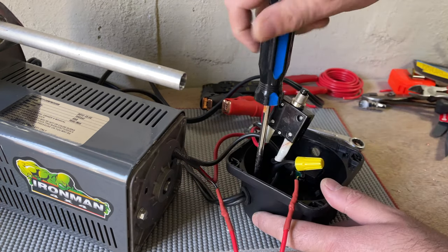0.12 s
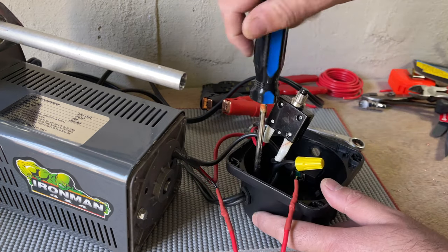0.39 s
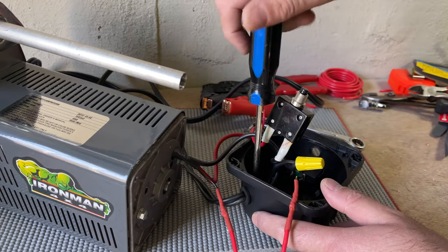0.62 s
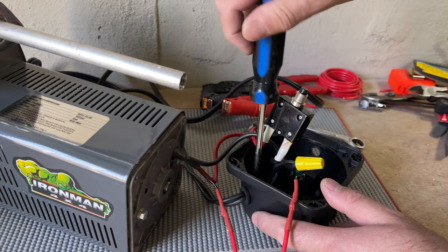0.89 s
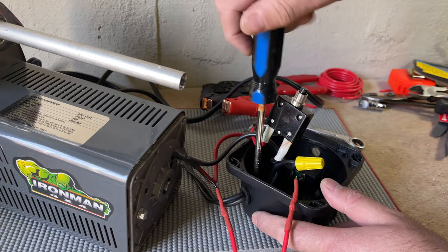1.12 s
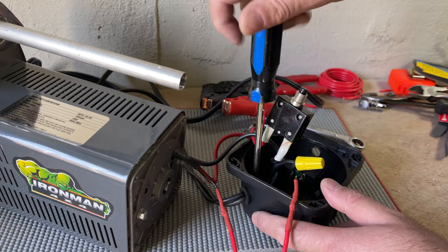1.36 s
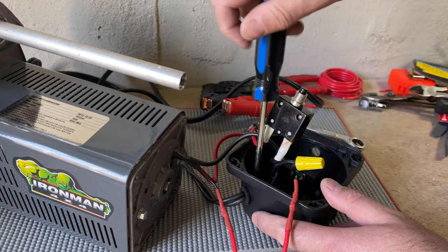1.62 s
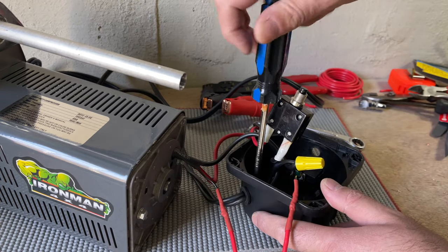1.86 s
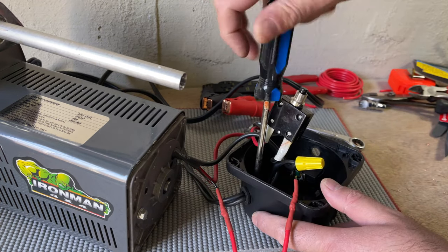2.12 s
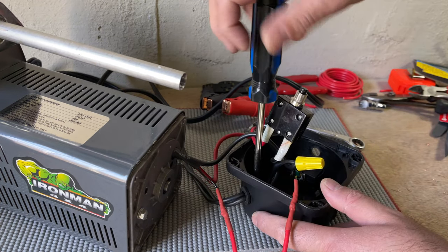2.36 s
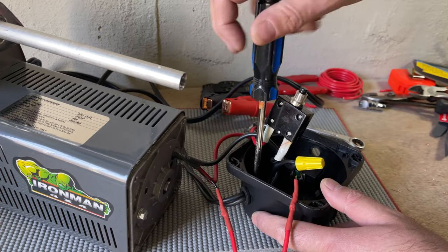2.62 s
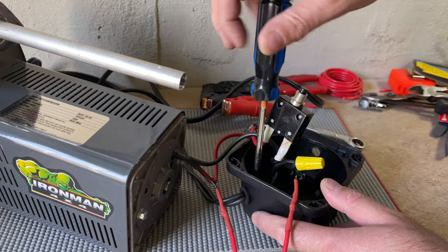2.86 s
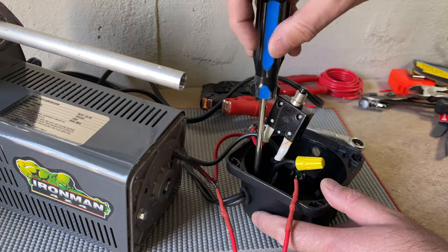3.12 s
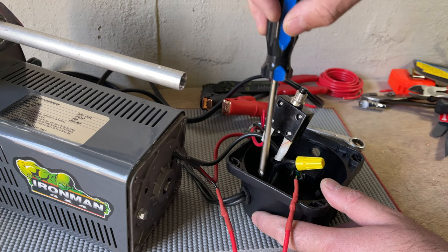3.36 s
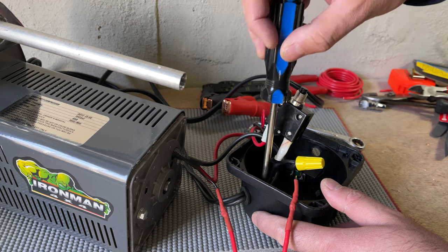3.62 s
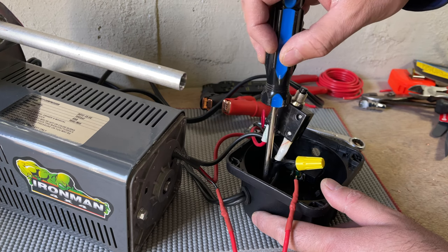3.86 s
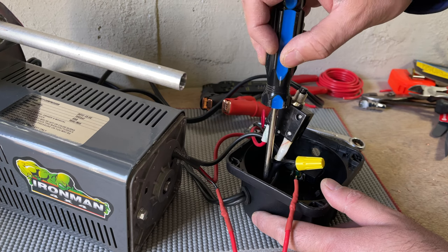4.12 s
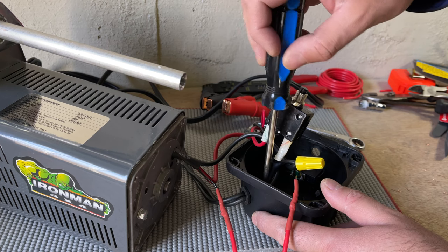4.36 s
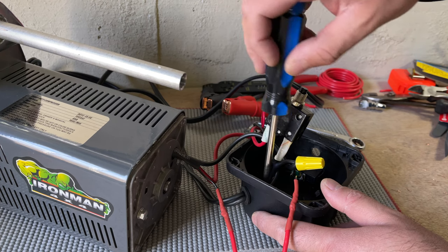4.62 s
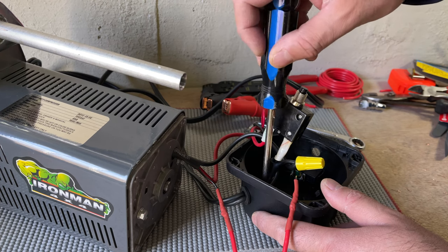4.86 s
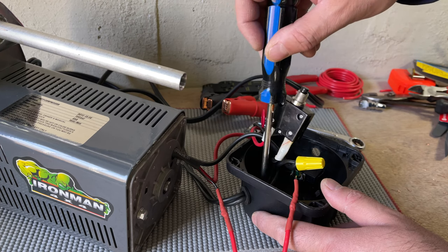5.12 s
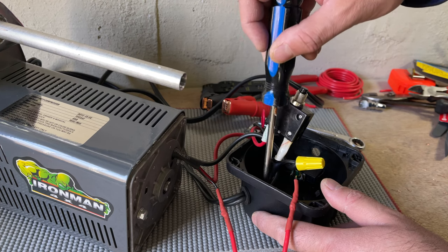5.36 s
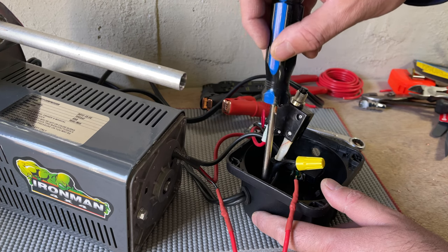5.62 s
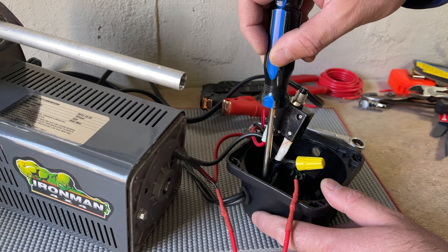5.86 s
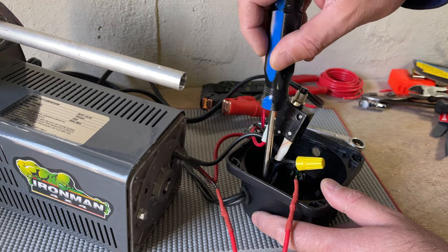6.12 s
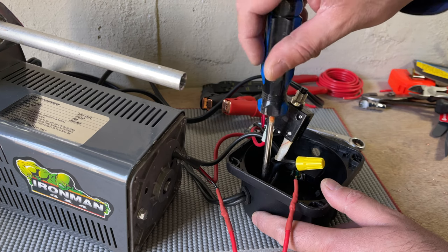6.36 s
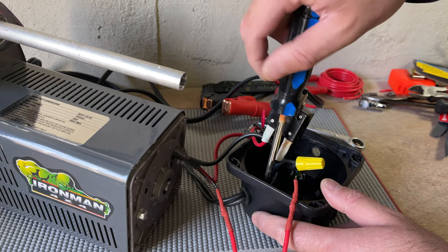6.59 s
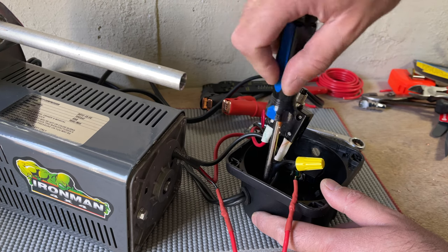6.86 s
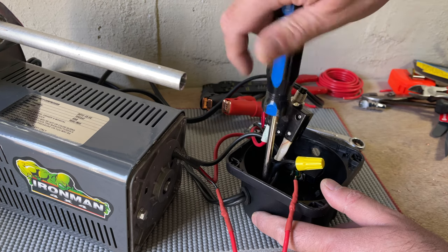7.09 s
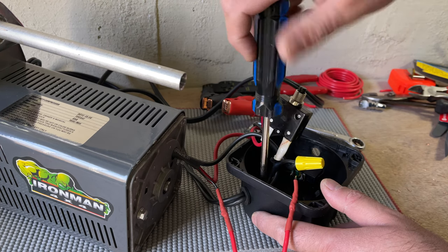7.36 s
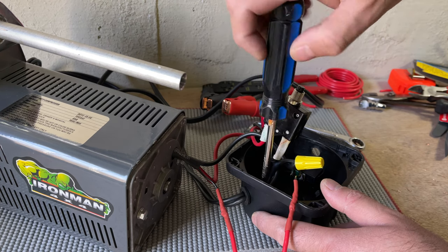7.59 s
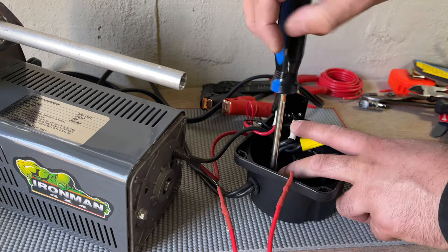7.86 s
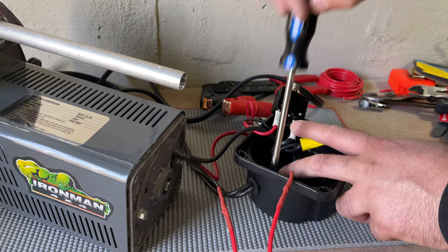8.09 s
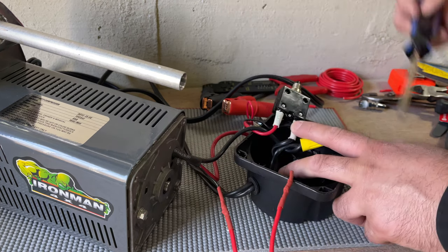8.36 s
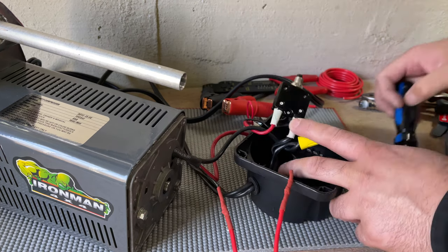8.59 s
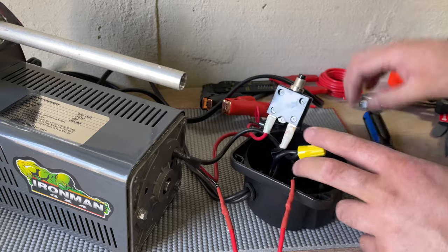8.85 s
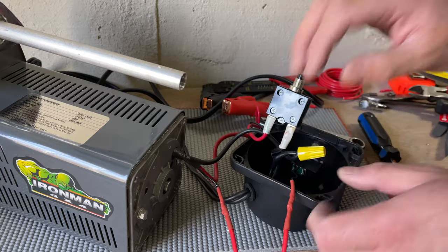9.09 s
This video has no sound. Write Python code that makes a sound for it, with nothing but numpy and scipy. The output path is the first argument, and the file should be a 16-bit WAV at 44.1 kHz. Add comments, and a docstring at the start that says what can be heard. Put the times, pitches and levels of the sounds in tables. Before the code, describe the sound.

Light irregular metal ticks and plastic knocks from a screwdriver working in a small box, with rapid papery finger slides between them. Later knocks are sharper and more isolated over very quiet low rumble and a distant engine-like hum. Near the end the tool is dropped: two heavy clattering impacts with small bounces on wood, by far the loudest event, then hand rustle. Close microphone, short indoor reverberation.

```python
"""In a small workshop, at a wooden bench, a screwdriver spun in the fingers drives screws into a plastic box.
The tip knocks and skids in the screw heads, ringing decaying modes of screw, box and bench with noise bursts.
Fingers slide on the grip as swelling noise; at the end the dropped tool bounces on the bench.
Shaped noise makes a low rumble from outside, a wavering sine a passing drone; the room scatters the blows.
A stereo microphone with resonant ports picks it all up, and its input stage rounds the peaks."""
import sys
import numpy as np
from scipy import signal
from scipy.fft import rfft, irfft, next_fast_len
from scipy.io import wavfile

SR = 44100
rng = np.random.default_rng(int(sys.argv[2]) if len(sys.argv) > 2 else 0)


def to_wav(s):
    """Save 16-bit WAV."""
    ch = np.atleast_2d(s).T  # columns
    pcm = np.round(np.clip(ch, -1, 1) * 32767)  # PCM
    wavfile.write(sys.argv[1], SR, pcm.astype(np.int16))


def makeup_ratio(level_db):
    """Linear amplitude ratio for a level in decibels (20 dB per factor of ten)."""
    decades = np.asarray(level_db, float) / 20
    return 10 ** decades


N = 406602

# modes of the wooden bench: f/Hz, level/dB, t60/s
BENCH_MODES = [(118, -22, 0.037), (165.2, -3.5, 0.16), (172.2, -5, 0.091), (219.3, -4.5, 0.065),
               (239, -10.5, 0.056)]


def rms_one(x):
    """Scaled to rms 1."""
    return x / np.sqrt(np.mean(x ** 2) + 1e-20)


def in_time(rows):
    """Columns of a table whose first column is t/s, interpolated at every sample."""
    s, *columns = np.transpose(rows)
    return [np.interp(np.arange(N) / SR, s, c) for c in columns]


def at_hz(points, hz, axis=1):
    """A column of a table, read on a log-frequency axis."""
    points = np.array(points)
    return np.interp(np.log(hz), np.log(points[:, 0]), points[:, axis])


def drift(rate_hz):
    """Random wander of rms 1: noise smoothed by two equal poles at rate_hz, at a 40th of the sample rate."""
    r = np.exp(-80 * np.pi * rate_hz / SR)
    noise = rng.standard_normal(N // 40 + 2002)
    slow = signal.lfilter([1], [1, -2 * r, r * r], noise)[2000:]
    return np.interp(np.arange(N) / 40, np.arange(len(slow)), rms_one(slow))


def ring(push, hz, t60):
    """A damped resonator: a unit click sets a sine of height 1 ringing."""
    r, w = makeup_ratio(-60 / (t60 * SR)), 2 * np.pi * hz / SR
    return signal.lfilter([0, np.sin(w)], [1, -2 * r * np.cos(w), r * r], push + 1e-18)


def band_pass(x, low_hz, high_hz):
    """Second-order Butterworth band."""
    return signal.sosfilt(signal.butter(2, [low_hz, high_hz], "band", fs=SR, output="sos"), x)


def bands(size):
    """Half-octave bands of stereo noise, each with its centre; mid and side set how alike the channels are."""
    # diffuse sound at the microphone: f/Hz, left-right likeness (1 = the same)
    likeness = [(60, 0.99), (200, 0.94), (400, 0.46), (900, 0.21), (2500, 0.32), (6000, 0.11), (8000, 0.87),
                (10000, 1), (13000, 0.9)]
    edges_hz = 22 * 2 ** np.arange(0, 9.6, .5)
    white = rng.standard_normal((2, 2, size))      # neighbouring bands take different noise
    for k, (low, high) in enumerate(zip(edges_hz, edges_hz[1:])):
        centre = np.sqrt(low * high)
        mid, side = band_pass(white[k % 2], low, high)
        alike = np.clip(at_hz(likeness, centre), -1, 1)
        yield centre, np.sqrt(1 + alike) * mid + np.sqrt(1 - alike) * side * [[1], [-1]]


def room_tone():
    """Shaped noise of the quiet room, moving as a whole with the rumble from outside."""
    # spectrum of the quiet room: f/Hz, relative level per Hz/dB
    quiet = [(15, -49), (27, -20.5), (40, -3), (60, 4), (92, -9), (119, -6.5), (155, -23), (266, -33),
             (381, -28), (485, -40), (1000, -64.5), (3000, -63.5), (6600, -62.5), (12000, -69)]
    # outside rumble, below 50 Hz: t/s, level/dB
    rumble = [(0.0, -56), (0.6, -58), (1.8, -59.5), (3.3, -58), (3.7, -62.5), (4.9, -58), (6.2, -62),
              (6.9, -61), (7.84, -56.5), (8.17, -66), (8.5, -62.5)]
    tone = sum(band * makeup_ratio(at_hz(quiet, hz)) for hz, band in bands(N))
    tone_low = signal.sosfilt(signal.butter(4, 50, fs=SR, output="sos"), tone)
    rumble_db, = in_time(rumble)
    return makeup_ratio(rumble_db) * tone / np.std(tone_low)


def drone():
    """A far engine note: one sine that wavers a little in level, glides in pitch and stops."""
    # the far note: t/s, f/Hz, level/dB
    note = [(5.3, 58.6, -62), (5.45, 59.05, -46.5), (6.04, 60.1, -49.5), (6.32, 62, -51.5),
            (6.45, 64.03, -47), (7.13, 62, -47), (7.6, 60.07, -48.5), (7.8, 65.1, -43), (7.82, 62, -65)]
    hz, level_db = in_time(note)
    start, stop = note[0][0], note[-1][0]
    on = np.interp(np.arange(N) / SR, [start - .2, start, stop, stop + 0.04], [0, 1, 1, 0])
    wave = np.sin(2 * np.pi * np.cumsum(hz) / SR)
    return np.sqrt(2) * on * makeup_ratio(level_db + 0.5 * drift(8.3)) * wave


def bench_tremble():
    """Uneven small pushes of the hands keep the bench modes stirring."""
    # bench under the hands: t/s, level/dB
    tremble = [(0.0, -51), (0.6, -59.5), (0.9, -72.5), (1.24, -60), (1.85, -58), (2.0, -50), (2.35, -58),
               (2.5, -40.5), (2.64, -59.5), (3.1, -59), (3.33, -76), (4.0, -76), (4.66, -57.5),
               (5.05, -90.5), (6.2, -90), (6.47, -46.5), (6.9, -74.5), (7.3, -59.5), (8.05, -76.5)]
    pushes = rng.standard_normal(N) * makeup_ratio(4.3 * drift(17.3))
    stir = sum(makeup_ratio(db) * ring(pushes, hz, t60) for hz, db, t60 in BENCH_MODES)
    level_db, = in_time(tremble)
    return makeup_ratio(level_db) * rms_one(stir)


def finger_levels():
    """Each slide swells to its loudest moment and fades, over a background of hiss and rub; both in dB."""
    # background hiss and rub under the slides: t/s, hiss level/dB, coarse rub level/dB
    background = [(0, -64.5, -70.5), (0.6, -71.5, -86.5), (1.7, -64.5, -94), (1.82, -98, -105),
                  (2.15, -63.5, -74), (3.0, -72, -88.5), (3.9, -84.5, -100), (4.3, -103, -88),
                  (5.3, -80, -110), (6.05, -87.5, -105), (6.25, -71, -82), (7.0, -80, -91),
                  (7.75, -64, -95), (7.84, -94, -98), (8.0, -90, -92), (8.1, -53, -75), (8.55, -63, -78),
                  (9.219, -46, -59)]
    # slides over the grip: loudest moment t/s, swell/s, fade/s, skin hiss level/dB, coarse rub level/dB
    slides = [(0.114, 0.057, 0.044, -57, -89), (0.233, 0.042, 0.066, -49.5, -64),
              (0.377, 0.044, 0.024, -56, -74), (0.494, 0.094, 0.023, -45.5, -61.5),
              (0.706, 0.17, 0.12, -57.5, -69.5), (0.85, 0.032, 0.018, -55, -79),
              (0.93, 0.028, 0.24, -57, -73), (1.203, 0.1, 0.051, -52, -66), (1.335, 0.11, 0.17, -63, -77),
              (1.455, 0.033, 0.077, -52, -66), (1.73, 0.13, 0.038, -53.5, -64),
              (1.778, 0.057, 0.015, -68, -72), (1.917, 0.016, 0.036, -47.5, -70.5),
              (1.989, 0.16, 0.095, -54, -65.5), (2.243, 0.072, 0.047, -46, -61.5),
              (2.5, 0.1, 0.073, -51, -62), (2.735, 0.025, 0.038, -43.5, -56.5),
              (2.846, 0.065, 0.11, -66, -87), (2.983, 0.054, 0.068, -47.5, -69.5),
              (3.15, 0.0053, 0.08, -54, -62), (3.624, 0.53, 0.39, -72, -82), (4.46, 0.37, 0.37, -71, -76.5),
              (4.737, 0.28, 0.36, -73, -81), (5.93, 0.089, 0.056, -82, -84),
              (6.14, 0.069, 0.08, -68, -80.5), (6.485, 0.097, 0.061, -53, -69.5),
              (6.583, 0.1, 0.35, -60, -72), (6.779, 0.12, .2, -65, -66), (7.088, 0.54, 0.15, -59.5, -79),
              (7.264, 0.076, 0.032, -43, -60.5), (7.405, 0.13, 0.089, -61, -75),
              (7.54, 0.063, 0.049, -50.5, -62), (7.752, 0.012, 0.06, -57, -80),
              (7.779, .04, 0.036, -68, -74), (7.811, 0.035, 0.0067, -57, -69),
              (7.94, 0.065, 0.03, -50.5, -67), (8.05, 0.026, 0.071, -56, -63.5),
              (8.35, 0.41, 0.15, -50, -60.5), (9.043, 0.62, 0.18, -49.5, -54.5)]
    span_db = 20      # level change over one swell or fade time
    t, power = np.arange(N) / SR, makeup_ratio(2 * np.array(in_time(background)))
    for s, swell_s, fade_s, *levels_db in slides:
        near = slice(max(int((s - 3 * swell_s) * SR), 0), int((s + 3 * fade_s) * SR))
        away = np.maximum((s - t[near]) / swell_s, (t[near] - s) / fade_s)
        power[:, near] += makeup_ratio(2 * (np.array(levels_db)[:, None] - span_db * away))
    return 10 * np.log10(power)


def finger_noise(hiss_db, rub_db):
    """Skin hiss and coarse rubbing, two colours of one noise bank, flickering as skin sticks and slips."""
    # colour of the skin hiss: f/Hz, relative level per Hz/dB
    hiss_colour = [(5500, -59.5), (7000, 3), (9000, 5), (13000, 0.5)]
    # colour of the coarse rub: f/Hz, relative level per Hz/dB
    rub_colour = [(200, -0.5), (350, 12), (1200, 6.5), (1700, 2.5), (2700, 1.5), (3600, -2), (5500, 1.5),
                  (7000, -10.5), (9000, -25.5)]
    hiss_trim_db = 9.5      # level trim of the skin hiss/dB
    hiss, rub = 0, 0
    for hz, band in bands(N):
        flicker = makeup_ratio(1.84 * drift(7.7))
        hiss = hiss + band * makeup_ratio(at_hz(hiss_colour, hz)) * flicker
        rub = rub + band * makeup_ratio(at_hz(rub_colour, hz)) * flicker
    grain_db = 1.9 * drift(42.1)      # the skin sticks and slips
    rub_top = signal.sosfilt(signal.butter(4, 2500, "high", fs=SR, output="sos"), rub)
    mix = makeup_ratio(hiss_db - hiss_trim_db) * rms_one(hiss) + makeup_ratio(rub_db) * rub / np.std(rub_top)
    return mix * makeup_ratio(grain_db)


def thread_catches(rub_db, per_s=500, lift_db=-5.0):
    """While the tool turns or skids, tip and thread catch in dense uneven slips that come in clumps."""
    # the tip skids across the screw head: middle t/s, half length/s, level/dB
    skids = [(0.709, 0.014, -56), (0.952, 0.021, -62), (1.201, 0.025, -66), (1.45, 0.019, -55.5),
             (1.938, 0.017, -69.5), (2.24, .04, -68), (2.476, 0.049, -72), (2.741, 0.02, -56),
             (2.931, 0.029, -66), (7.774, 0.037, -73.5), (7.907, 0.042, -64), (7.958, 0.01, -58)]
    # what a scraping tip sets ringing: f/Hz, level/dB, t60/s
    grit = [(1150, -8, .012), (2430, -8, .012), (3400, -2, .008), (3750, -2, .008), (4600, -8, .007),
            (5450, -2, .008), (5800, -4, .008), (6460, -7, .006)]
    t, level = np.arange(N) / SR, makeup_ratio(rub_db + lift_db)
    for s, length_s, db in skids:
        near = slice(int((s - length_s) * SR), int((s + length_s) * SR))
        level[near] += makeup_ratio(db) * np.cos(np.pi / 2 * np.clip((t[near] - s) / length_s, -1, 1)) ** 2
    happens = rng.random(N) < per_s * makeup_ratio(3.0 * drift(30.0)) / SR
    height = makeup_ratio(1.6 * np.minimum(rng.exponential(1, N), 3))
    slips = happens * height * rng.choice([-1, 1], N)
    return sum(makeup_ratio(db + 5.0 * drift(12.0)) * ring(level * slips, hz, t60) for hz, db, t60 in grit)


def struck(times, peaks_db, modes, spread_db, smear_s, one_way=False):
    """Every blow reaches each mode with its own strength, small delay and sign (unless pushed one way)."""
    out, luck = np.zeros(N), rng.standard_normal((len(times), len(modes), 3))
    for k, (hz, level_db, t60) in enumerate(modes):
        push = np.zeros(N)
        at = ((times + smear_s * np.abs(luck[:, k, 0])) * SR).astype(int)
        sign = -1 if one_way else np.sign(luck[:, k, 2])
        np.add.at(push, at, sign * makeup_ratio(peaks_db + level_db + spread_db * luck[:, k, 1]))
        first = at.min()
        out[first:] += ring(push[first:], hz, t60)
    return out


def crack(times, peaks_db, t60, low_hz, high_hz, rise_s=0.00077):
    """The contact itself: a burst of noise with a rapid swell and an exponential decay."""
    push, ease = np.zeros(N), np.exp(-1 / (rise_s * SR))
    np.add.at(push, (times * SR).astype(int), makeup_ratio(peaks_db))
    poles = np.convolve([1, -makeup_ratio(-60 / (t60 * SR))], [1, -ease])
    shape = signal.lfilter([1 - ease], poles, push + 1e-18)
    return band_pass(shape * rng.standard_normal(N), low_hz, high_hz)


def with_chatter(rows, drop_db, wait_s, spread_s, count):
    """Each blow comes with a few weaker touches, after it or (negative wait) just before."""
    rows = np.array(rows, float)
    luck = rng.random((len(rows), count, 2))
    touches = np.repeat(rows[:, None], count, axis=1)
    touches[:, :, 0] += wait_s + spread_s * luck[:, :, 0]
    touches[:, :, 1:] += drop_db - 5.8 * luck[:, :, 1:]
    return np.vstack([rows, touches.reshape(-1, rows.shape[1])])


def blows(rows, low, high, middle, top, spread_db, puff_db, knock_db, crack_db, sizzle_db, air_db,
          crack_t60, edge_hz):
    """The struck parts ring and crack at once; the bench answers a moment later."""
    bench_lag_s = 0.00323
    s, bench_db, low_db, high_db, middle_db, top_db = np.transpose(rows)
    body = struck(s, low_db, low, spread_db=1.5, smear_s=0.001997)
    body += crack(s, low_db + puff_db, 0.025, low_hz=250, high_hz=735)
    body += struck(s, high_db, high, spread_db, smear_s=0.001025)
    body += struck(s, middle_db, middle, spread_db, smear_s=0.001224)
    # the many small modes, heard as noise
    body += crack(s, high_db + knock_db, crack_t60, low_hz=705, high_hz=1710)
    click = struck(s, top_db, top, spread_db=4.0, smear_s=0.0022)
    click += crack(s, top_db + crack_db, crack_t60, low_hz=2300, high_hz=6480)
    hardness_db = top_db - high_db      # steel on steel clicks more than it knocks, and is brighter
    click += crack(s, top_db + sizzle_db + 0.47 * hardness_db, crack_t60, low_hz=7900, high_hz=edge_hz)
    # the very top grows faster than the click, so hard blows dominate it
    click += crack(s, air_db + 1.3 * top_db, crack_t60, low_hz=11800, high_hz=15600)
    bench = struck(s + bench_lag_s, bench_db, BENCH_MODES, spread_db=1.5, smear_s=0.00096, one_way=True)
    # the blows are kept free of deep bass
    return signal.sosfilt(signal.butter(2, 92.0, "high", fs=SR, output="sos"), body + click + bench)


def tool_drop():
    """The dropped tool bounces: grip, collar and shaft ring, and the steel shaft sings once."""
    # bounces: t/s, then level/dB of bench, grip low, grip high, grip collar, shaft click
    bounces = [(8.564, -12.5, -5.5, -7, -4.5, -17), (8.597, -15.5, -8.5, -9, -16, -18),
               (8.622, -37, -14, -16, -34, -29), (8.695, -28, -34, -32, -33, -33),
               (8.779, -2, -2, -14.5, -12, -19.5), (8.798, -12, -3, -4.5, -9.5, -12.5),
               (8.83, -32, -9, -19, -27, -42), (8.853, -7, -5.5, -6, -7, -22.5),
               (8.868, -45, -10.5, -33, -32, -34), (8.89, -9.5, -12.5, -23, -23, -47),
               (8.935, -13.5, -5.5, -15, -14, -29.5), (8.957, -12.5, -13, -10, -17, -40)]
    # modes of the grip's low part, its high part, the collar and the shaft: f/Hz, level/dB, t60/s
    grip_low, grip_high = [(305, -16.5, 0.055), (345, -6.5, 0.048), (412, -15, 0.022), (490, -11, 0.051),
                           (546, -6.5, 0.033), (560, -11, 0.016), (621, -12, 0.055), (660, -15, 0.028),
                           (780, -19, .03)], [(830, -5, .015), (930, -3, .022), (1010, -5, .018),
                                             (1100, -4, .02), (1195, -6, .018), (1274, -9, .018)]
    collar, shaft = [(1380, -10, .015), (1490, -8, .018), (1660, -10, .016), (1860, -14, .013),
                     (2160, -21, .012), (2510, -19, .012)], [(2910, -8.5, 0.011), (3240, -7, 0.016), (3700, -5, 0.0079),
                                     (4320, -5.5, 0.02), (5200, -36, 0.0073), (8820, -14, 0.0057)]
    # the shaft sings when its end lands: t/s, level/dB, f/Hz, t60/s
    shaft_ring = (8.802, -45, 8292, .35)
    rows = with_chatter(bounces, drop_db=-13.0, wait_s=0.001977, spread_s=0.018, count=3)
    drop = blows(rows, grip_low, grip_high, collar, shaft, spread_db=1.0, puff_db=-3.0, knock_db=4.5,
                 crack_db=-3.0, sizzle_db=-8.5, air_db=-32, crack_t60=0.028, edge_hz=10900)
    s, level_db, hz, t60 = shaft_ring
    click = np.zeros(N)
    click[int(s * SR)] = 1
    return drop + makeup_ratio(level_db) * ring(click, hz, t60)


def tip_knocks():
    """The tip knocks in the screw heads: box wall, box rim, screw, tip and bench ring."""
    # knocks: t/s, then level/dB of bench, box wall, box rim, screw, tip click
    taps = [(0.092, -66, -56, -49, -61, -75), (0.17, -32.5, -32.5, -27, -34, -34.5),
            (0.317, -53, -54, -47.5, -53, -57), (0.354, -42.5, -54, -49, -54, -65),
            (0.435, -39.5, -39.5, -34, -42, -49), (0.529, -44.5, -53, -65, -65, -57),
            (0.638, -53, -53, -62, -65, -70), (0.657, -40.5, -38.5, -35, -43.5, -47.5),
            (0.71, -36, -63, -43, -46, -40), (0.903, -40, -44.5, -32.5, -36, -38),
            (0.945, -33, -55, -44, -54, -46), (0.972, -41, -61, -43, -54, -49),
            (0.99, -59, -59, -52, -60, -66), (1.006, -42.5, -47, -52, -61, -69),
            (1.062, -41.5, -52, -42.5, -44, -54), (1.116, -45, -46, -37.5, -39, -49),
            (1.141, -29, -36.5, -37, -44, -52), (1.19, -37, -67, -47, -50, -39.5),
            (1.205, -34, -59, -47, -53, -42), (1.244, -34, -37, -34.5, -63, -59),
            (1.405, -34.5, -35, -36, -41, -46), (1.449, -37, -72, -49, -58, -37),
            (1.505, -43, -49, -62, -64, -58), (1.652, -45.5, -49.5, -38, -42, -48.5),
            (1.719, -49, -51, -37, -46, -48), (1.776, -42, -49, -54, -46, -53),
            (2.077, -55, -46.5, -50.5, -47.5, -54.5), (2.165, -66, -55, -56, -62, -72),
            (2.185, -38, -36.5, -36.5, -44, -67), (2.315, -58, -47, -49, -56, -71),
            (2.385, -66, -59, -52, -58, -71), (2.444, -32.5, -37, -39, -42, -48),
            (2.465, -49, -49, -44, -50.5, -60), (2.51, -67, -42.5, -37.5, -51, -40.5),
            (2.685, -29.5, -40, -27, -31, -32.5), (2.728, -77, -40.5, -24, -39, -44),
            (2.849, -67, -45, -41.5, -56, -45), (2.882, -71, -74, -59, -61, -49),
            (2.928, -38.5, -43, -42, -53, -48), (3.07, -49, -55.5, -61, -62, -72),
            (3.16, -45, -51.5, -44, -34, -36.5), (3.735, -29, -25.5, -28.5, -26, -32),
            (3.949, -47, -43.5, -43, -41.5, -52.5), (4.015, -51, -59, -46, -48, -58),
            (4.04, -57, -56, -52, -55, -59), (4.096, -25, -27, -24, -23, -31),
            (4.257, -43, -49, -42.5, -44, -77), (4.585, -49, -36, -30, -48.5, -79),
            (4.819, -49, -58, -44.5, -38, -48), (4.921, -41.5, -76, -46.5, -62, -76),
            (4.965, -40, -49, -33, -32, -38), (4.974, -35, -27.5, -23, -19, -21.5),
            (5.021, -36, -45.5, -41, -21.5, -27.5), (5.049, -34.5, -41, -40, -39, -51),
            (5.098, -52, -66, -61, -56, -49), (5.109, -51, -44, -35, -38, -35.5),
            (5.122, -61, -53, -44, -42, -44), (5.398, -26, -24.5, -22, -15, -22),
            (5.545, -57, -57, -50, -63, -70), (5.789, -27.5, -28.5, -36, -30, -37.5),
            (5.85, -54, -55, -47, -48, -56), (5.875, -33.5, -39, -32, -32, -34),
            (6.254, -19, -22.5, -17.5, -14, -12.5), (6.29, -48, -37, -37, -34, -50),
            (6.465, -41, -53, -59, -64, -52), (6.502, -41, -42.5, -45, -51.5, -50.5),
            (6.565, -41, -45, -53, -46.5, -61), (6.787, -28.5, -26, -28, -35, -40.5),
            (6.8, -25, -40, -30.5, -27, -34), (6.82, -48, -40, -41, -22, -16),
            (7.061, -35.5, -37.5, -39, -61, -45), (7.162, -45, -54, -44, -54, -62),
            (7.178, -32, -38, -47, -33, -42.5), (7.361, -47, -52.5, -52, -55, -55),
            (7.385, -41.5, -55, -52.5, -55, -69.5), (7.465, -33, -43, -60, -59, -56),
            (7.474, -24.5, -20.5, -25, -20.5, -23.5), (7.545, -32, -71, -58, -52, -50),
            (7.603, -40.5, -42.5, -59, -44, -58), (7.763, -40, -47, -50, -54, -63),
            (7.813, -58, -60, -57, -50, -54), (7.861, -51, -75, -55, -56, -41),
            (7.884, -42, -46, -69, -68, -70), (7.903, -52, -67, -62, -56, -44),
            (7.92, -38, -42.5, -53, -50, -45.5), (7.938, -35.5, -45, -57, -43.5, -54),
            (7.963, -50, -66, -62, -44, -46.5), (8.036, -96.5, -68, -54, -37, -45),
            (8.06, -49, -56, -51, -41, -32.5), (8.176, -96, -74, -35, -62, -72),
            (8.21, -56, -53, -54, -53, -50)]
    # modes of the plastic box's wall and rim, the screw and the tip: f/Hz, level/dB, t60/s
    box_wall, box_rim = [(300, -13, .04), (345, -12, .035), (409, -11, .03), (478, -2, .035),
                         (540, -7, .025), (600, -2, .022), (681, -4, .025), (750, -12, .018)], [(800, -14, .014), (916, -11, .016), (1000, -6, .015),
                                           (1080, -9, .018), (1167, -6, .017), (1260, -12, .012),
                                           (1423, -14, .012), (1600, -17, .01)]
    screw, tip = [(1440, -13, .016), (1570, -15, .013), (2200, -19, .012), (2350, -14, .013),
                  (2450, -12, .017), (2560, -16, .012), (2760, -20, .01)], [(3040, -12.5, 0.0027), (3434, -17.5, .012), (3520, -15.5, 0.028),
                                 (4270, -12.5, .008), (4650, -16.5, 0.013), (5490, -13, 0.0037),
                                 (5860, -11.5, 0.0055), (6360, -13, 0.0071), (8660, -18, 0.0035)]
    rows = with_chatter(taps, drop_db=-24.0, wait_s=-0.006, spread_s=0.0024, count=1)
    rows = with_chatter(rows, drop_db=-19.0, wait_s=0.002, spread_s=0.008, count=1)
    return blows(rows, box_wall, box_rim, screw, tip, spread_db=1.0, puff_db=1.5, knock_db=-6.5,
                 crack_db=-0.5, sizzle_db=-2.5, air_db=8.5, crack_t60=0.0096, edge_hz=12000)


def room(x, near_s=0.0024, far_s=0.0025):
    """A quick scatter off near things, then the walls' return, partly coloured by the blow, partly diffuse."""
    # the workshop: f/Hz, near surfaces level/dB, far walls level/dB, wall t60/s
    surfaces = [(101, -36, -8, 0.47), (254, 13, -7, 0.73), (695, 6.5, -10.5, 0.64), (2030, 2.5, -14, 0.64),
                (5500, 3, -12, 0.55), (10000, 1.5, -18.5, 0.31)]
    near_t60 = 0.014
    coloured_share = .4      # part of the walls' energy that keeps the fine colour of the blow
    t, answer, walls, build = np.arange(SR) / SR, 0, 0, np.exp(-1 / (far_s * SR))
    for hz, band in bands(SR):
        t60 = at_hz(surfaces, hz, axis=3)
        near = makeup_ratio(at_hz(surfaces, hz) - 60 * t / near_t60) / np.sqrt(near_t60) * (t > near_s)
        far = makeup_ratio(at_hz(surfaces, hz, axis=2) - 60 * t / t60) * np.sqrt(coloured_share / t60)
        far *= 1 - np.exp(-t / far_s)
        answer = answer + band * (near + far) * np.sqrt(np.log(1000) / SR)
    for hz, band in bands(N):
        sent = band_pass(x, hz * 2 ** -.25, hz * 2 ** .25) ** 2
        keep = makeup_ratio(-120 / (at_hz(surfaces, hz, axis=3) * SR))      # energy left after one sample
        poles = np.convolve([1, -keep], [1, -build])
        stored = signal.lfilter([(1 - keep) * (1 - build)], poles, sent + 1e-18)
        diffuse = np.sqrt((1 - coloured_share) * np.abs(stored)) * rms_one(band)
        walls = walls + makeup_ratio(at_hz(surfaces, hz, axis=2)) * diffuse
    return signal.fftconvolve(x[None], answer, axes=1)[:, :N] + walls


def scene():
    """Knocks, catches and the drop in the room, over finger noise, bench tremble, rumble and drone."""
    hiss_db, rub_db = finger_levels()
    steady = room_tone() + drone() + bench_tremble() + finger_noise(hiss_db, rub_db)
    contacts = thread_catches(rub_db) + tool_drop() + tip_knocks()
    return contacts + room(contacts) + steady


def top_cut(x):
    """Nothing passes above the cut-off."""
    return signal.sosfilt(signal.butter(12, 16650, fs=SR, output="sos"), x)


def record(dry):
    """The microphone ports resonate near 10 kHz, where left and right also turn against each other."""
    # port response: f/Hz, level/dB
    port_response = [(25, -3.5), (45, -1.5), (6500, -4.5), (8600, 0.5), (10500, 6.5), (11400, 0.5),
                     (12100, -17.5), (12800, -15), (14000, -37), (16000, -23)]
    # left minus right: f/Hz, level/dB
    left_gain = [(60, 2.5), (110, 0.5), (200, -0.5), (380, 1.8), (700, 1), (1290, 3), (2380, 4), (4400, 3),
                 (8120, 2), (10000, 0)]
    # phase by which the left leads: f/Hz, lead/rad
    left_lead = [(0, 0), (1900, -.3), (2700, .5), (5600, .8), (6600, 0), (7800, .9), (8300, .2),
                 (8800, -.4), (9300, -1.5), (10300, -3.14), (11400, -5.2), (11900, -5.6), (16000, -5.6)]
    overload_top = 1.3      # the input stage rounds peaks towards this height
    size = next_fast_len(N + 4096)
    hz = np.arange(size // 2 + 1) * SR / size + 1e-3
    # half of the difference on each side
    left = makeup_ratio(at_hz(left_gain, hz) / 2) * np.exp(.5j * np.interp(hz, *np.transpose(left_lead)))
    response = makeup_ratio(at_hz(port_response, hz)) * [left, 1 / left]
    heard = irfft(rfft(dry, size) * response, size)[:, :N]
    return top_cut(overload_top * np.tanh(heard / overload_top))


dry = scene()
out = record(dry)
to_wav(out)
```